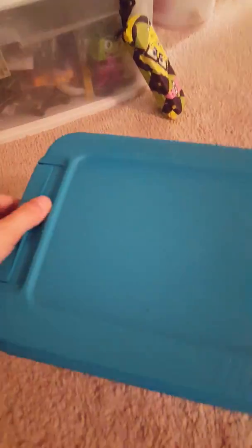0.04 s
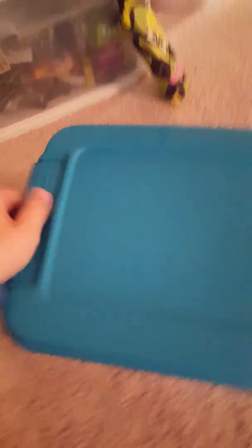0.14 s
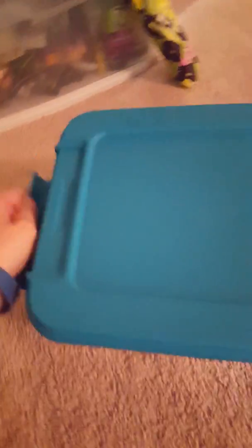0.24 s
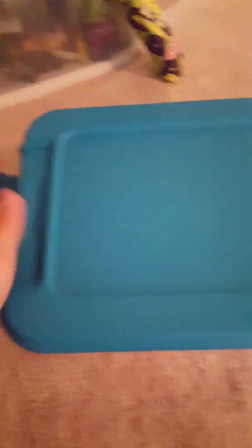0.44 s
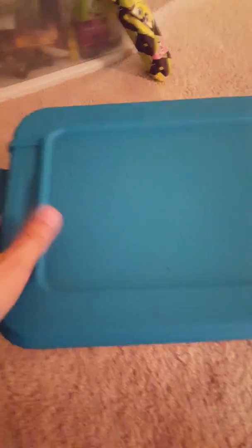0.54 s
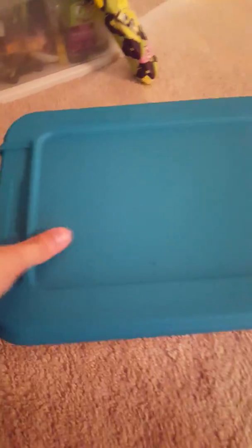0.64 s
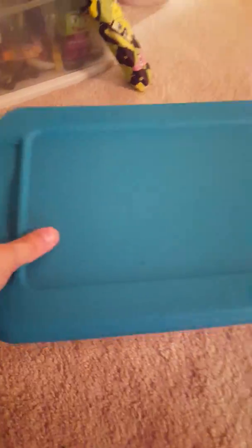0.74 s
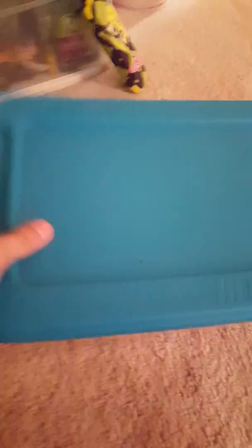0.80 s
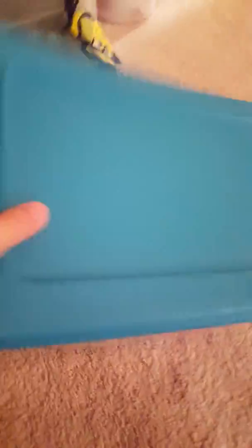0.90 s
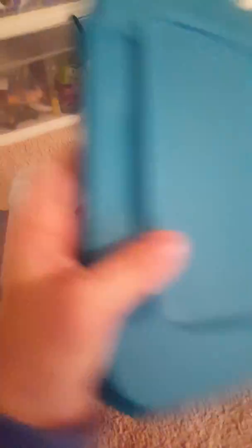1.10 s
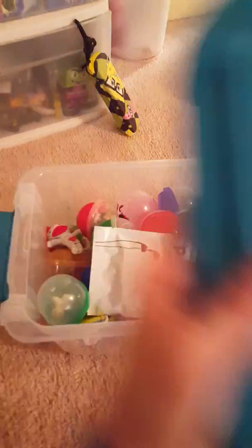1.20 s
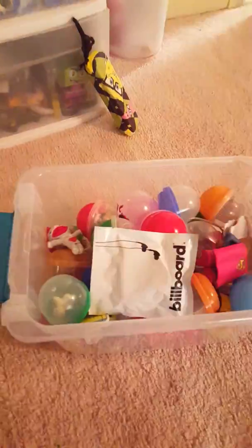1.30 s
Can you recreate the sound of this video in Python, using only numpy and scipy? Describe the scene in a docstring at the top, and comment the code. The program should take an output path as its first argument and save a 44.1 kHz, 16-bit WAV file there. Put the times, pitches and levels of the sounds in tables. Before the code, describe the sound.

Plastic storage bin being opened, with a latch snap, hollow knocks and light scraping.

```python
"""Opening a plastic storage bin

A bin on a carpet, close up: its latch snaps open, the lid judders free of the rim, knocks against it
and is lifted away. Each contact rings the cavity, the broad lid, the stiffer walls and the hard edge;
hand and plastic rub in between. A small, soft room with a low hum."""
import sys
import numpy as np
from scipy import signal
from scipy.fft import rfft, irfft, next_fast_len
from scipy.io import wavfile

SR = 44100
rng = np.random.default_rng(int(sys.argv[2]) if len(sys.argv) > 2 else 0)


def dump(signal):
    """Clip the signal to [-1, 1] and save it as 16-bit WAV at the path in sys.argv[1]."""
    limited = np.clip(np.atleast_2d(signal).T, -1, 1)
    pcm = np.round(limited * 32767).astype(np.int16)
    wavfile.write(sys.argv[1], SR, pcm)


N = 59535


def undb(db):
    """Decibels to gain."""
    return 10 ** (np.asarray(db) / 20)


def unit(x):
    """Scale to rms 1."""
    return x / np.sqrt(np.mean(x ** 2))


def unit_onset(x):
    """Scale to rms 1 over the first 8 ms."""
    return x / np.sqrt(np.mean(x[..., :int(.008 * SR)] ** 2))


def pan(db):
    """Stereo gains, left louder by db."""
    return unit(undb(np.array([[db], [-db]]) / 2))


def decay(t, t60_s):
    """Exponential decay."""
    return np.exp(-np.log(1000) * t / t60_s)


def cut(x, kind, hz):
    """Second-order lowpass or highpass."""
    return signal.sosfilt(signal.butter(2, hz, kind, fs=SR, output="sos"), x)


def colour(x, points):
    """Minimum-phase filter through (freq_hz, gain_db) points."""
    n = 2 * next_fast_len(x.shape[-1])
    hz, db = np.array(points, float).T
    bins_hz = np.arange(n // 2 + 1) * SR / n
    gain = undb(np.interp(np.log(bins_hz + 1), np.log(hz), db))
    cepstrum = irfft(np.log(gain))
    cepstrum[1:n // 2] *= 2
    cepstrum[n // 2 + 1:] = 0
    return irfft(rfft(x, n) * np.exp(rfft(cepstrum)))[..., :x.shape[-1]]


def noise(size, correlation):
    """Stereo white noise, partly shared between channels."""
    z = rng.standard_normal((3, size))
    return np.sqrt(correlation) * z[0] + np.sqrt(1 - correlation) * z[1:]


def ring(t, modes, scatter_rad, highpass_hz):
    """Damped modes, each with a random phase offset between channels."""
    phases = scatter_rad * rng.standard_normal((len(modes), 1, 1)) * np.array([[1], [-1]])
    tones = sum(undb(db) * decay(t, t60_s) * np.sin(2 * np.pi * hz * t + phase)
                for (hz, db, t60_s), phase in zip(modes, phases))
    attack = 1 - np.exp(-2 * np.pi * modes[-1][0] * t)
    return unit_onset(cut(tones * attack, "highpass", highpass_hz))


def burst(t, points, t60_s, strike, tail_db, tail_t60_s):
    """Crowded, damped modes: sharp strike, quick decay, faint tail from bin and room."""
    x = noise(len(t), .24) * decay(t, t60_s)
    x += undb(tail_db) * noise(len(t), 0) * decay(t, tail_t60_s)
    x[0, 0] += strike
    x[1, int(.00007 * SR)] += strike  # reaches the right slightly later
    return unit_onset(colour(x, points))


# Room air spectrum: freq_hz, gain_db
ROOM_SPECTRUM = [(25, -23), (45, -15), (80, 3), (130, -7.5), (250, -6), (500, -14.5), (1100, -21),
                 (2500, -28.5), (5700, -40), (12500, -40.5), (16000, -41)]

def room(air_db=-53.5, hum_hz=58.5, hum_db=-56):
    """Still indoor air and a low appliance hum."""
    low = cut(noise(N, .8), "lowpass", 600)
    high = cut(noise(N, .2), "highpass", 600)
    air = unit(colour(low + high, ROOM_SPECTRUM))
    hum = np.sqrt(2) * np.sin(2 * np.pi * hum_hz * np.arange(N) / SR)
    return (undb(air_db) * air + undb(hum_db) * hum) * pan(1.2)


# Skin rub and hiss spectra: freq_hz, gain_db
RUB_SPECTRUM = [(200, -25), (600, -6), (1500, 6), (3000, 2), (5500, 0.5), (8000, -9.5), (16000, -10)]
HISS_SPECTRUM = [(500, -15), (6000, -11), (8500, -4.5), (11500, -0.5), (13500, -3.5), (16000, -19)]
# Hand strokes: start_s, length_s, rub_db, hiss_db
STROKES = [(-.03, 0.0845, -54, -62), (0.075, 0.052, -62, -66), (0.217, 0.15, -53, -62),
           (0.347, 0.076, -69, -69), (0.407, 0.067, -61, -58), (0.546, 0.077, -69, -63),
           (.645, .055, -74, -67), (0.993, 0.069, -58, -56), (1.08, 0.067, -56.5, -65.5),
           (1.229, 0.081, -63, -70.5), (1.303, 0.053, -56.5, -70)]

def hand_slides(fade_s=.017):
    """Skin slides over textured plastic: a grainy rub under an airy hiss."""
    out, t = np.zeros((2, N)), np.arange(N) / SR
    grain = undb(2 * rng.standard_normal(N))
    rub = unit(colour(grain * noise(N, .056), RUB_SPECTRUM))
    hiss = unit(colour(grain * noise(N, .056), HISS_SPECTRUM))
    for start_s, length_s, rub_db, hiss_db in STROKES:
        gate = np.clip(np.minimum(t - start_s, start_s + length_s - t) / fade_s, 0, 1)
        out += gate * (undb(rub_db) * rub + undb(hiss_db) * hiss)
    return out * pan(1.4)


# Scrape envelope: time_s, level_db
SCRAPE_LEVELS = [(0, -49), (.12, -63.5), (0.223, -58), (0.288, -30.5), (.36, -43.5), (.395, -42),
                 (.44, -42), (0.519, -36), (0.599, -49.5), (.67, -55), (0.728, -67), (.88, -71), (.98, -63),
                 (1.02, -43), (1.12, -45.5), (1.2, -56), (1.35, -60)]
# Scrape spectrum: freq_hz, gain_db
SCRAPE_SPECTRUM = [(50, -35), (100, -20), (170, -5), (330, 0), (500, -7), (1100, -17), (2500, -22),
                   (4500, -33), (9000, -50)]

def rim_scrape(catches_per_s=1200, catch_t60_s=.019):
    """The lid sticks and slips on the rim in tiny uneven catches, each ringing briefly."""
    caught = rng.random(N) < catches_per_s / SR
    strength = undb(2.45 * np.minimum(rng.exponential(size=N), 4))
    catches = caught * strength * rng.standard_normal(N)
    t = np.arange(N // 30) / SR
    catch_ring = noise(len(t), .88) * decay(t, catch_t60_s)
    friction = signal.fftconvolve(catches[None], catch_ring)[:, :N]
    level_db = np.interp(np.arange(N) / SR, *np.array(SCRAPE_LEVELS).T)
    return unit(colour(friction, SCRAPE_SPECTRUM)) * undb(level_db) * pan(2.4)


# Cavity modes: pitch_hz, gain_db, t60_s
CAVITY_MODES = [(114.3, 0.46, 0.12), (133, -2.5, 0.098)]

def cavity_thump(t):
    """The hollow of the bin rings low."""
    return ring(t, CAVITY_MODES, scatter_rad=.25, highpass_hz=143)


# Wall modes: pitch_hz, gain_db, t60_s
WALL_MODES = [(514, 4.5, 0.075), (567.5, -1.5, 0.18), (695, -5.5, 0.15), (767, -7, .07),
              (855.7, 1.5, 0.092), (999, -10, 0.15), (1051, -0.5, 0.069), (1152, -1.5, 0.08)]
# Clack spectrum: freq_hz, gain_db
CLACK_SPECTRUM = [(60, -54.5), (150, -27), (280, -23.5), (450, 7.5), (850, 4.5), (1150, -3), (1500, -10.5),
                  (3000, -37)]

def wall_clack(t):
    """The stiff walls clack and ring in the midrange."""
    ringing = ring(t, WALL_MODES, scatter_rad=1, highpass_hz=263)
    clack = burst(t, CLACK_SPECTRUM, t60_s=.026, strike=10.3, tail_db=-10.5, tail_t60_s=.15)
    return unit_onset(clack + undb(-5) * ringing)


# Edge crack spectrum: freq_hz, gain_db
CRACK_SPECTRUM = [(200, -25), (700, -16), (1300, -4), (1600, 2), (2000, 1), (2300, -3.5), (3100, -7.5),
                  (3700, -11.5), (4300, -11), (5500, -27.5), (9000, -32.5)]

def edge_crack(t, ring_hz):
    """The hard edge cracks, with a short ring that depends on where it is hit."""
    crack = burst(t, CRACK_SPECTRUM, t60_s=.022, strike=7.5, tail_db=-20.5, tail_t60_s=.3)
    ringing = signal.lfilter(*signal.iirpeak(ring_hz, Q=5.3, fs=SR), crack)
    return unit_onset(crack + undb(-4.5) * unit_onset(ringing))


# Edge tick spectrum: freq_hz, gain_db
TICK_SPECTRUM = [(300, -42), (2500, -41), (4500, 3), (6500, 0.5), (8000, -4), (11500, -2.5), (14000, -8.5),
                 (16000, -37)]

def edge_tick(t):
    """The bright top of a contact on the edge."""
    return burst(t, TICK_SPECTRUM, t60_s=.018, strike=5.3, tail_db=-12.5, tail_t60_s=.11)


# Lid modes: pitch_hz, gain_db, t60_s
LID_MODES = [(182.7, 3.5, 0.13), (211.5, 2, 0.13), (252.3, -2.5, 0.11), (314, -4.5, 0.08),
             (342.6, 2.5, 0.1), (448, 3.5, 0.071)]

def lid_knock(t, flex_hz, rise_s=.0036, width_oct=.48):
    """The lid flexes briefly and leaves the modes near that rate ringing."""
    flex = np.sin(2 * np.pi * flex_hz * t) * decay(t, t60_s=.031) * (1 - np.exp(-t / rise_s))
    flex = unit_onset(cut(flex, "highpass", 143))
    excited = [(hz, db - 10 * np.log10(1 + (np.log2(hz / flex_hz) / width_oct) ** 4), t60_s)
               for hz, db, t60_s in LID_MODES]
    ringing = ring(t, excited, scatter_rad=.3, highpass_hz=143)
    return unit_onset(flex + undb(.5) * ringing)


# Contacts of latch, lid and rim:
# start_s, thump_db, lid_db, wall_db, crack_db, tick_db, flex_hz, edge_hz, pan_db
CONTACTS = [ (0.1599, -71, -43, -60, -64, -72, 220, 1910, 1),
            (0.2337, -48, -32.5, -28, -30, -40.5, 288, 4120, 5.5),
            (0.2366, -59, -23, -34, -37, -49, 247, 1530, -1),
            (.2450, -52, -28.5, -52, -58, -58, 300, 3940, -1),
            (.2730, -62, -44, -30, -30, -37, 366, 1540, 3.5),
            (0.2761, -61, -29.5, -23.5, -30.5, -71, 255, 3120, 38),
            (0.2935, -52, -25, -42, -55, -68, 260, 1600, 4),
            (0.3192, -48, -24.5, -40.5, -36.5, -70, 203, 1630, 14),
            (0.3282, -38, -29, -43, -39, -72, 335, 1990, -4),
            (0.34, -66, -29, -37.5, -60, -75, 264, 1500, 2),
            (0.4006, -62, -33.5, -36.5, -44, -61, 321, 2720, -2.5),
            (0.4151, -56, -31, -50, -57, -57, 293, 2200, 9),
            (0.4247, -42, -27.5, -37.5, -40.5, -57, 317, 5000, -7),
            (.4340, -37, -28.5, -37.5, -54, -68, 217, 2800, 15),
            (0.4732, -35, -22, -29.5, -42, -54, 296, 1690, 2),
            (.4780, -51, -16.5, -26, -30, -46, 264, 1990, 4.5),
            (.5040, -62, -23, -32, -47, -69, 181, 2100, 13),
            (.5220, -36, -34, -37.5, -41.5, -73, 375, 2780, -2),
            (0.5491, -50, -33.5, -50, -54, -65, 228, 3330, 13),
            (0.555, -37, -30.5, -44, -50, -72, 179, 2000, 2),
            (.5700, -38.5, -29.5, -34.5, -39, -65, 194, 2740, 0.5),
            (0.641, -75, -46, -60, -72, -76, 235, 2000, -10),
            (0.667, -69, -44.5, -54, -70, -83, 357, 2000, 12),
            (.6900, -68, -41.5, -83, -76, -76, 222, 1990, 3),
            (0.7693, -61, -32.5, -52, -54, -82, 272, 1830, 6),
            (.7810, -42, -31.5, -41, -48, -65.5, 226, 2356, -1),
            (.9175, -80, -46, -43, -50.5, -71, 404, 1500, 3.5),
            (0.9611, -50, -52, -44.5, -40.5, -87, 477, 2760, 1.5),
            (.9890, -66, -32.5, -34.5, -38.5, -48, 370, 1480, 3.5),
            (1.002, -68, -36.5, -64, -70, -71, 245, 2000, 1),
            (1.0549, -36.5, -24, -25.5, -33, -45, 323, 3750, 4.5),
            (1.065, -30.5, -29, -38.5, -39.5, -54, 238, 1800, 1.5),
            (1.103, -59, -52, -43, -47.5, -55.5, 366, 3450, 3),
            (1.1300, -44, -41.5, -48, -48.5, -58, 335, 3250, 1),
            (1.1550, -61, -45, -58, -61, -66, 316, 4000, 4),
            (1.1870, -80, -46, -48, -53.5, -61.5, 360, 1270, 3.5),
            (1.215, -78, -53, -52.5, -56.5, -69, 397, 1860, -1),
            (1.2640, -77, -70, -53, -62, -61.5, 390, 3170, 3)]

def contacts():
    """Each contact rings cavity, lid and walls, and cracks at the edge."""
    out, t = np.zeros((2, N)), np.arange(N // 4) / SR
    for start_s, thump_db, lid_db, wall_db, crack_db, tick_db, flex_hz, edge_hz, pan_db in CONTACTS:
        body = undb(thump_db) * cavity_thump(t) + undb(lid_db) * lid_knock(t, flex_hz)
        wall = undb(wall_db) * wall_clack(t)
        edge = undb(crack_db) * edge_crack(t, edge_hz) + undb(tick_db) * edge_tick(t)
        knock = body + pan(pan_db) * (wall + edge)
        i = int(start_s * SR)
        out[:, i:i + len(t)] += knock[:, :N - i]
    return out


def scene():
    """Knocks and rubbing in a quiet room."""
    return contacts() + rim_scrape() + hand_slides() + room()


def record(dry, top_hz=16100):
    """Steep lowpass on the top treble."""
    return signal.sosfilt(signal.ellip(8, .2, 70, top_hz, fs=SR, output="sos"), dry)


dry = scene()
out = record(dry)
dump(out)
```